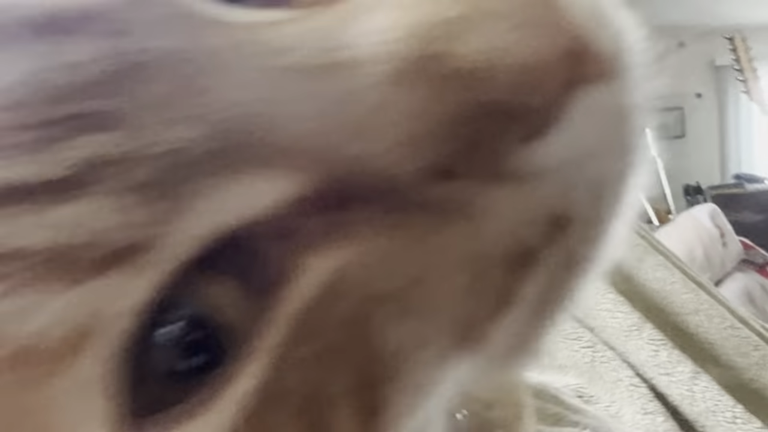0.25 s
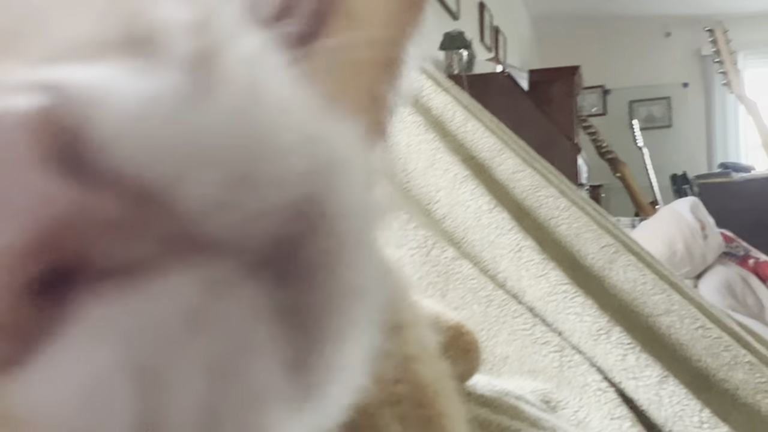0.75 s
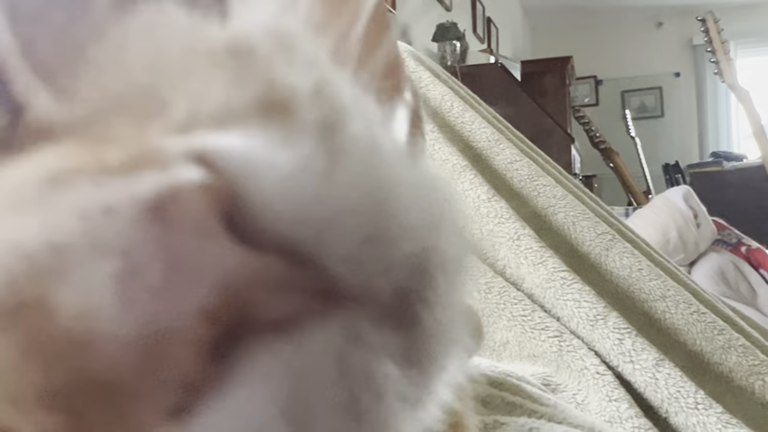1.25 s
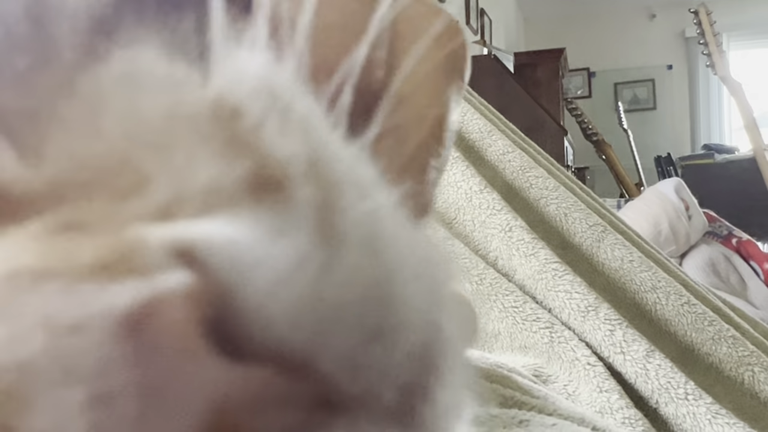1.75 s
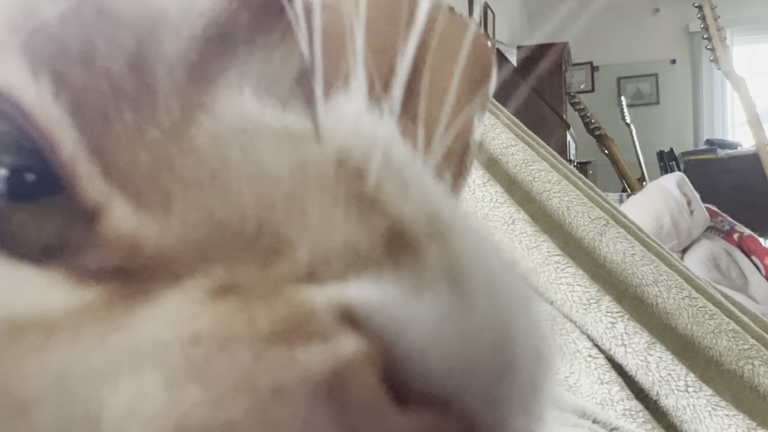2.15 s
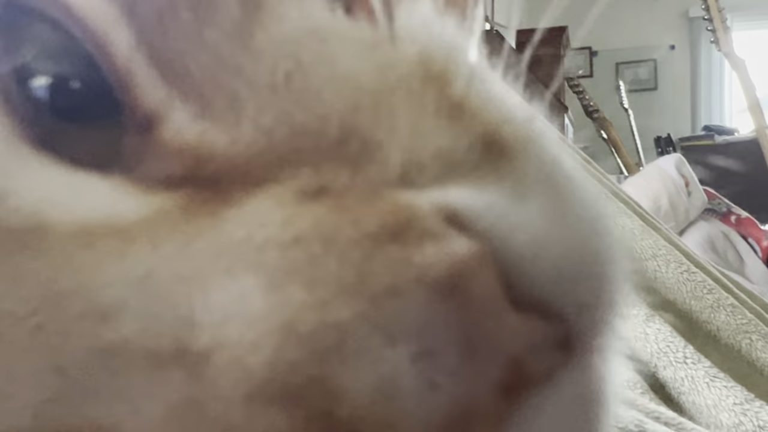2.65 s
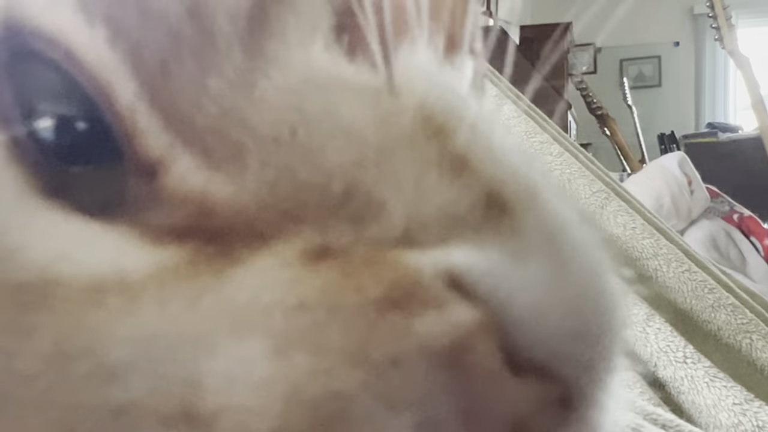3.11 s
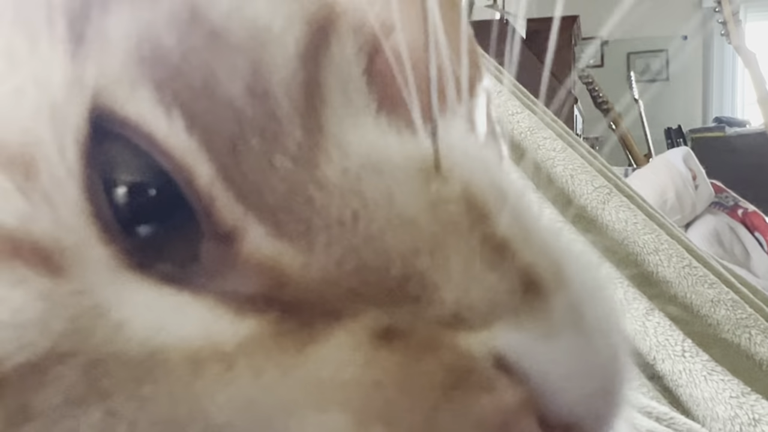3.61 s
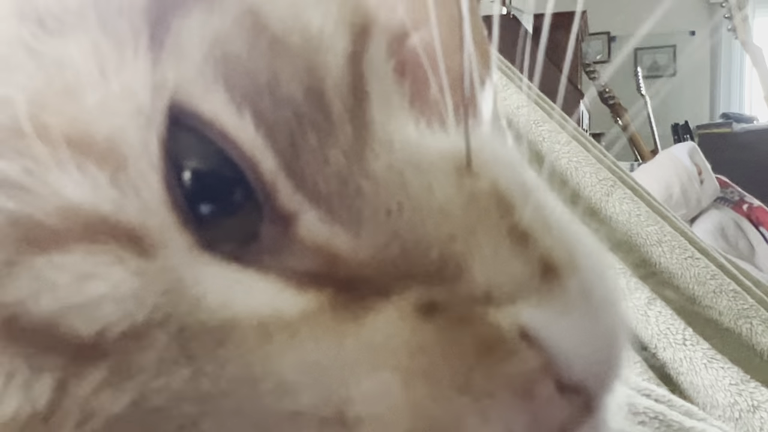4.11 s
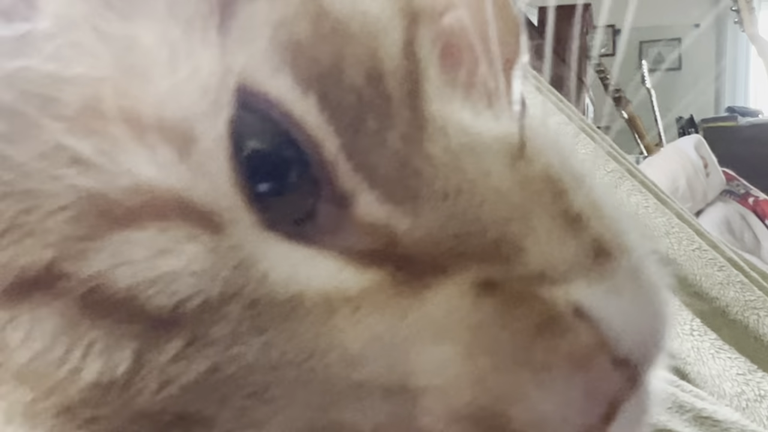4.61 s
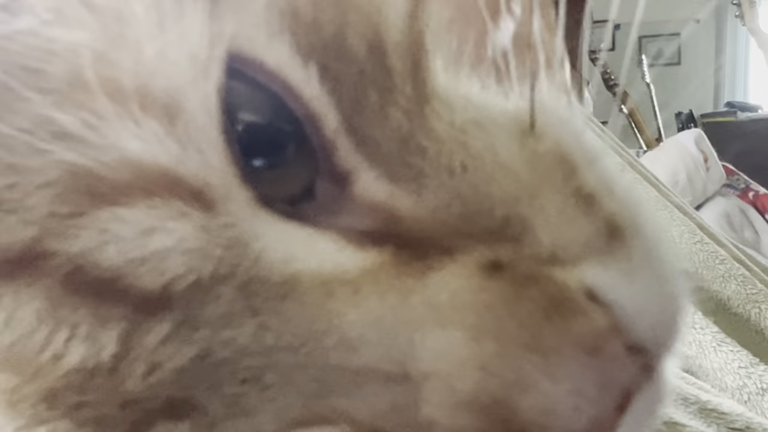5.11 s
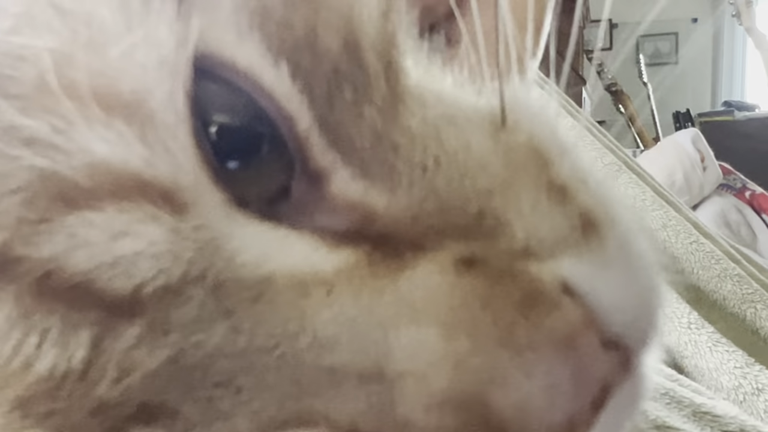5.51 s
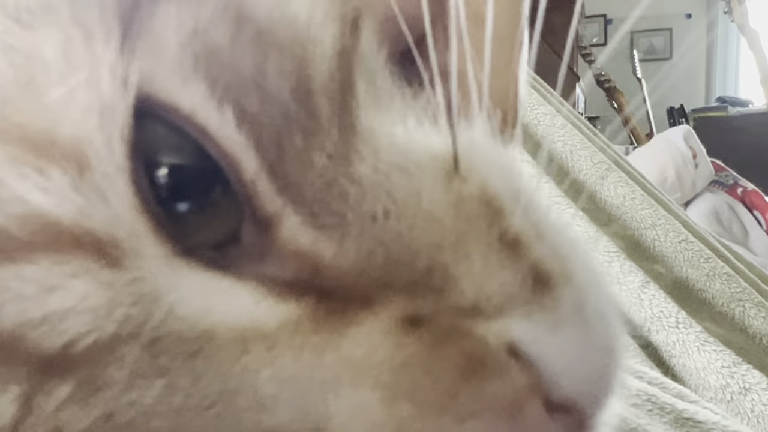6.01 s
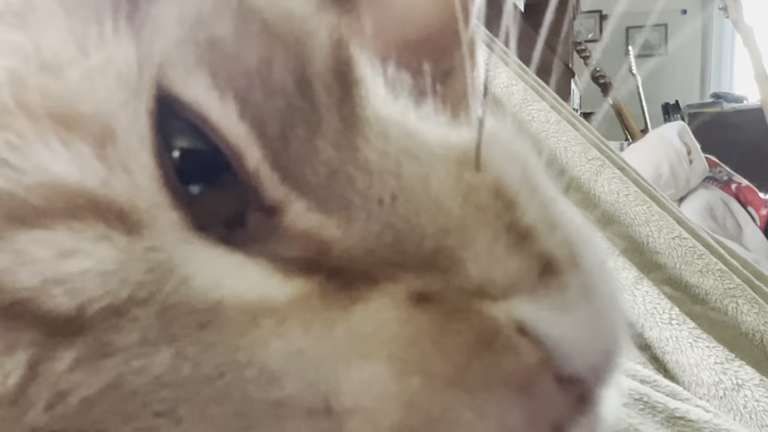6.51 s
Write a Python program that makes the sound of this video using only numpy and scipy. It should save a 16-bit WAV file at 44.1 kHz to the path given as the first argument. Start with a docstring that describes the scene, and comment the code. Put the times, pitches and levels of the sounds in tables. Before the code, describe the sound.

Very close cat purring: deep fluttering chest rumble, five brief rolling trills with nasal hiss, soft throat catches and faint puffs of hiss.

```python
"""A quiet room: a cat purrs with its nose almost on the microphone.
The larynx throbs about thirty times a second: a low chest rumble that five times swells into a trill,
where every throb is a short burst of vocal-fold slaps ringing in throat and mouth, with hiss and a faint
falling whistle in the nose. Small throat catches and mouth ticks are pulses of tone and noise.
Shaped noise makes the puffs of hiss, about four a second, and the still air of the room."""
import sys
import numpy as np
from scipy import signal
from scipy.fft import rfft, irfft
from scipy.io import wavfile
from scipy.ndimage import uniform_filter1d

SR = 44100
rng = np.random.default_rng(int(sys.argv[2]) if len(sys.argv) > 2 else 0)


def output_pcm(signal):
    """Save a mono or channel-first signal as 16-bit PCM at the path in sys.argv[1].

    Samples are clipped to [-1, 1] before scaling.
    """
    pcm = np.clip(np.atleast_2d(signal).T, -1, 1) * 32767
    wavfile.write(sys.argv[1], SR, np.round(pcm).astype(np.int16))


N = 297675
TIME = np.arange(N) / SR
BINS = np.maximum(np.arange(N // 2 + 1) * SR / N, 1)   # Hz
THROB_S = 0.032   # nominal length of one throb

# trills, levels ahead of the output gains: (first throb [s], last throb [s], throb rate [1/s], rise [s],
# hold [s], flutter peak [dB], fade by the end [dB], overtone peak [dB], chest rumble [dB],
# fold pressure at the peak [0-1], fold pressure at the end [0-1])
TRILLS = [(0.361, .523, 31, 0.0043, 0.084, -44.5, 4, -53.5, -53, 0.13, .12),
          (1.59, 1.88, 31, 0.069, 0.11, -36, 12.5, -48.3, -54.5, 0.8, 0.05),
          (2.845, 3.28, 32.4, 0.041, .13, -32, 10, -47, -48.5, 1, 1),
          (4.432, 4.758, 30.7, 0.11, .02, -40.5, 9.5, -53, -56, .75, 0.07),
          (5.932, 6.363, 32.5, 0.033, 0.015, -37, 7.5, -51, -56.5, 0.97, .94)]


def from_db(db):
    """Decibels to gain."""
    return 10 ** (np.asarray(db) / 20)


def rms_one(x):
    """Scale to unit rms."""
    return x / np.sqrt(np.mean(x ** 2) + 1e-20)


def at_bins(points):
    """Interpolate a spectrum along log frequency."""
    hz, value = np.transpose(points)
    return np.interp(np.log(BINS), np.log(hz), value)


def noise(spectrum, channels=1):
    """Gaussian noise of a given spectrum, at unit rms."""
    white = rng.standard_normal((channels, N))
    return rms_one(irfft(rfft(white) * from_db(at_bins(spectrum)), N))


def cut(x, hz, kind, order=2):
    """Butterworth low- or high-pass."""
    return signal.sosfilt(signal.butter(order, hz, kind, fs=SR, output="sos"), x + 1e-18)


def resonate(x, modes):
    """Parallel two-pole resonances: (frequency [Hz], width [Hz], gain [dB])."""
    out = 0
    for hz, width_hz, db in modes:
        r = np.exp(-np.pi * width_hz / SR)
        poles = [1, -2 * r * np.cos(2 * np.pi * hz / SR), r * r]
        ringing = signal.lfilter([1, 0, -1], poles, x + 1e-18)
        out = out + from_db(db) * ringing * (1 - r * r) / 2
    return out


def progress(when, start, end):
    """0 before start, 1 after end, a straight line between."""
    return np.clip((when - start) / max(end - start, 1 / SR), 0, 1)


def held(start, end, attack_s, release_s):
    """Envelope that is 1 from start to end, with Gaussian flanks."""
    before = np.maximum(start - TIME, 0) / attack_s
    after = np.maximum(TIME - end, 0) / release_s
    return np.exp(-before ** 2 - after ** 2)


def throb_times(quiet_throb_hz=28.18, jitter_s=0.0011):
    """The larynx closes regularly in each trill, a little more slowly and less evenly in between."""
    trills = [np.linspace(a, b, round((b - a) * rate) + 1) for a, b, rate, *_ in TRILLS]
    rests = zip([0] + [t[-1] for t in trills], [t[0] for t in trills] + [N / SR])
    quiet = [np.linspace(a, b, round((b - a) * quiet_throb_hz) + 1)[1:-1] for a, b in rests]
    quiet = np.concatenate(quiet)
    quiet = quiet + rng.normal(0, jitter_s, len(quiet))
    loud = [(s, *effort(row, s)) for row, times in zip(TRILLS, trills) for s in times]
    return loud, np.sort(np.concatenate([[0, N / SR], quiet, *trills]))


def effort(row, when, rise_db_per_s=134.5, overtones_follow=0.5, onset_pressure=0.25, relax_curve=1.2):
    """A trill rises quickly, holds and fades: flutter dB, overtone dB and fold pressure at a given time."""
    first, last, _, rise_s, hold_s, peak_db, fade_db, overtone_db, _, peak_pressure, end_pressure = row
    to_rise = 1 - progress(when, first, first + rise_s)
    drop_db = rise_db_per_s * rise_s * to_rise + fade_db * progress(when, first + rise_s + hold_s, last)
    # pressure moves to its peak during the rise, then to its end value
    relaxed = progress(when, first + rise_s, last) ** relax_curve
    pressure = peak_pressure + (onset_pressure - peak_pressure) * to_rise
    pressure = pressure + (end_pressure - peak_pressure) * relaxed
    return peak_db - drop_db, overtone_db - overtones_follow * drop_db, np.clip(pressure, 0, 1)


def folds(pressure):
    """Harder pressed, folds flutter lower, for a larger share of the throb, and more roughly."""
    light_hz, pressed_hz = 487, 280.3
    light_open, pressed_open = 0.38, 0.6   # share of the throb
    light_rough, pressed_rough = 0.18, 0.7
    hz = light_hz * (pressed_hz / light_hz) ** pressure
    share = light_open + (pressed_open - light_open) * pressure ** 4
    rough = light_rough + (pressed_rough - light_rough) * pressure ** 2
    return hz, share, rough


def fold_slaps(hz, share, rough, size, jitter=0.2, glide=0.5):
    """One throb: a handful of fold slaps that quicken as it goes; pressed hard, they come unevenly."""
    slaps, length_s, t = np.zeros(size), min(share, 1) * THROB_S, 0
    for late, strong in rng.standard_normal((16, 2)):
        if t >= length_s:
            break
        phase = (t + 0.001) / (length_s + 0.002)
        slaps[int(t * SR)] = np.sqrt(np.sin(np.pi * phase)) * np.exp(0.2 * rough * strong)
        t += np.exp(jitter * rough * late - glide * share * (phase - 0.5)) / hz
    return slaps


def trill(throbs, rasp_db=-28, follow=0.16, soften=0.53, vary_db=0.87, crisp_db=-6, size=2800):
    """Fold slaps ring in throat and mouth; returns that sound, the puffs of air let through, their crackle."""
    # resonances: (frequency [Hz], width [Hz], gain [dB])
    throat_modes = [(269, 170, -7.5), (386.4, 65, -7.5)]
    windpipe_modes = [(191, 54, -0.81)]
    mouth_modes = [(738, 510, 10), (1160, 95, -14)]
    flutter_spread = 0.04   # relative, from throb to throb at full pressure
    out, flow, crackle = np.zeros((3, N))
    age = np.arange(size) / SR
    for start, low_db, high_db, pressure in throbs:
        hz, share, rough = folds(pressure)
        hz = hz * np.exp(flutter_spread * pressure * rng.standard_normal())
        low_db, high_db = np.array([low_db, high_db]) + vary_db * rng.standard_normal(2)
        slaps = fold_slaps(hz, share, rough, size)
        opening = np.sin(np.pi * np.minimum(age / (share * THROB_S + 0.014), 1))
        # the throat sinks with the flutter; rough throbs shake the windpipe too
        sink = (hz / 420) ** follow
        throat = resonate(slaps, [(f * sink, width_hz, db) for f, width_hz, db in throat_modes])
        throat = throat + rough ** 2 * resonate(slaps, windpipe_modes)
        # soft tissue limits the swing
        throat = np.tanh(rms_one(throat) / 2.5)
        throat = cut(cut(throat, 475 * sink, "low", order=8), 120, "high")
        # the first slaps of a throb are the sharpest
        rasp = from_db(rasp_db) * opening * rng.standard_normal(size)
        sharp = (slaps + rasp) * np.exp(-soften * age / (share * THROB_S))
        mouth = cut(cut(resonate(sharp, mouth_modes), 1108, "low", order=8), 456, "high", order=3)
        # a throb rings on over two cycles
        at = slice(int(start * SR), int(start * SR) + size)
        out[at] += (from_db(low_db) * rms_one(throat) + from_db(high_db) * rms_one(mouth)) / np.sqrt(2)
        flow[at] += from_db(high_db) * opening
        crackle[at] += from_db(high_db + crisp_db) * rough * rms_one(slaps)
    return out, flow, crackle


def chest_levels(fade_share=0.51, rumble_late_s=0.071, rumble_attack_s=0.11):
    """Gains of the chest's tone and rumble: a resting purr, soft strokes, and a swell under each trill."""
    # soft strokes between the trills: (start [s], end [s], tone level ahead of the output gain [dB])
    soft_purrs = [(0.142, .2, -65), (0.98, 1.183, -50.5), (2.22, 2.57, -53.5), (3.634, 3.937, -54.5),
                  (5.1, 5.55, -59.5), (6.56, 6.66, -60.5)]
    soft_rumble_db = -9.5   # relative to the stroke's tone
    trill_tone_db = -11.5   # relative to the trill's flutter peak
    rest_tone_db, rest_rumble_db = -68.5, -62.5
    lead_s, lag_s, attack_s, release_s = 0.019, 0.027, 0.058, 0.062
    # powers add up
    tone, rumble = from_db(rest_tone_db) ** 2, from_db(rest_rumble_db) ** 2
    for start, end, db in soft_purrs:
        stroke = from_db(db) * held(start, end, attack_s, release_s)
        tone = tone + stroke ** 2
        rumble = rumble + (from_db(soft_rumble_db) * stroke) ** 2
    for first, last, _, rise_s, hold_s, peak_db, fade_db, _, rumble_db, *_ in TRILLS:
        fade = from_db(-fade_share * fade_db * progress(TIME, first + rise_s + hold_s, last))
        tone_swell = fade * held(first - lead_s, last + lag_s, attack_s, release_s)
        rumble_swell = fade * held(first + rumble_late_s, last + lag_s, rumble_attack_s, release_s)
        tone = tone + (from_db(peak_db + trill_tone_db) * tone_swell) ** 2
        rumble = rumble + (from_db(rumble_db) * rumble_swell) ** 2
    return np.sqrt(tone), np.sqrt(rumble)


def chest(throbs, tone_db=-1.0, rumble_db=3.0, deep_db=-60, throb_depth=0.16, delay_s=0.011):
    """The chest swings with every throb, mostly at twice its rate, over a rumble that pulses with it."""
    # chest vibration: (multiple of the throb rate, relative level [dB])
    orders = [(1, -10.5), (2, 0), (3, -14.5)]
    # rumble spectrum: (frequency [Hz], relative density [dB])
    rumble_spectrum = [(18, -14.5), (28, -8), (40, -12), (64, -0.5), (110, -5.5), (165, -12), (205, -11.5),
                       (250, -17.5), (350, -22), (450, -36.5), (700, -38), (1500, -95)]
    tone_gain, rumble_gain = chest_levels()
    turn = 2 * np.pi * np.interp(TIME - delay_s, throbs, np.arange(len(throbs)))
    tone = sum(from_db(db) * np.cos(round(multiple) * turn) for multiple, db in orders)
    rumble = noise(rumble_spectrum)[0] * (1 + throb_depth * np.cos(turn))
    # the deepest part keeps one level; effort drives the rest
    deep = from_db(deep_db) * rms_one(cut(rumble, 48, "low", order=4))
    upper = from_db(rumble_db) * rumble_gain * rms_one(cut(rumble, 87.5, "high", order=3))
    return np.sqrt(2) * from_db(tone_db) * tone_gain * tone + upper + deep


def nose(flow, crackle, air_db=-14, stream_share=1.0, wander_hz=150):
    """Puffs and slaps hiss in the nose; the narrow nostrils add a thin, falling whistle that flutters."""
    # resonances: (frequency [Hz], width [Hz], gain [dB])
    nose_modes = [(2064, 440, 2), (2930, 450, -11), (3990, 300, -1.5), (5200, 1400, -9.5),
                  (7400, 880, -8.5)]
    end_hz, fall_hz = 2994, 380   # the fall scales with the peak fold pressure
    whistle_db, lead_s, lag_s, fade_s = -80.5, 0.03, 0.027, 0.073
    stream = np.maximum(uniform_filter1d(flow, size=4000), 0)
    turbulence = rng.standard_normal(N) * (flow + stream_share * stream)
    air = from_db(air_db) * resonate(turbulence + crackle, nose_modes)
    wander = cut(rng.standard_normal(N) + 1j * rng.standard_normal(N), wander_hz, "low")
    whistle = 0
    for first, last, *_, pressure, _ in TRILLS:
        hz = end_hz + fall_hz * pressure * np.interp(TIME, [first, last], [1, 0])
        tone = rms_one((wander * np.exp(2j * np.pi * np.cumsum(hz) / SR)).real)
        whistle = whistle + tone * held(first - lead_s, last + lag_s, fade_s, fade_s)
    puffs = flow / (stream + 0.05 * stream.max())
    return air + from_db(whistle_db) * whistle * (1 + puffs) / 2


def small_sounds(catch_s=0.0029, tick_s=0.0015, grit_db=-12, tick_hz=1900, tick_width_hz=1600):
    """Catches are a few cycles of fold flutter, the higher ones gritty; ticks are short snaps in the mouth."""
    # soft catches of the throat: (time [s], envelope peak [dB], frequency [Hz])
    catches = [(0.31, -37.5, 256), (2.757, -47, 670), (2.785, -48, 760), (2.817, -43.5, 667),
               (2.832, -29, 250), (5.872, -55, 760), (5.907, -48.5, 667), (5.919, -37, 290)]
    # tiny wet ticks of the mouth: (time [s], peak [dB])
    ticks = [(2.353, -52.5), (2.766, -62), (3.267, -56)]
    out = np.zeros(N)
    grit = rms_one(cut(cut(rng.standard_normal(N), 1330, "low", order=5), 360, "high"))
    for s, db, hz in catches:
        age = np.clip(TIME - s, 0, 20 * catch_s)
        envelope = (age / catch_s * np.exp(1 - age / catch_s)) ** 2
        gritty = from_db(grit_db) * grit * (hz / 700) ** 2
        out += from_db(db) * envelope * (np.sin(2 * np.pi * hz * age) + gritty)
    for s, db in ticks:
        snap = rng.standard_normal(N) * (TIME >= s) * np.exp(-np.abs(TIME - s) / tick_s)
        snap = resonate(snap, [(tick_hz, tick_width_hz, 0)])
        out += from_db(db) * snap / np.abs(snap).max()
    return out


def hiss(hiss_db=5, apart_db=-8, edge=2.75, rest_db=-95, crest=0.45, longest_rise_s=0.1, rise=0.73, fall=0.74):
    """Each puff of faint bright hiss swells to a crest and fades, nearly alike at both ports."""
    # puffs: (start [s], length [s], level ahead of hiss_db [dB])
    puffs = [(0.193, 0.07, -78.5), (0.316, 0.16, -78.5), (0.474, 0.21, -68.5), (0.747, 0.128, -73.5),
             (0.938, 0.1, -71), (1.163, 0.128, -73), (1.327, 0.29, -72.5), (1.597, 0.034, -79),
             (1.703, 0.19, -73.5), (1.968, 0.12, -70.5), (2.182, 0.118, -74), (2.341, 0.12, -70.5),
             (2.563, 0.1, -76.5), (2.765, 0.19, -72), (3.008, 0.19, -74), (3.244, 0.15, -70.5),
             (3.495, 0.11, -72), (3.693, 0.16, -73.5), (3.97, 0.13, -76), (4.237, 0.13, -77),
             (4.513, 0.11, -75.5), (4.722, 0.18, -76), (5.048, 0.17, -76.5), (5.293, 0.15, -75),
             (5.588, 0.11, -80), (5.792, 0.13, -76.5), (6.012, 0.144, -73.5), (6.258, 0.21, -69.5),
             (6.556, 0.18, -73)]
    # hiss spectrum: (frequency [Hz], relative density [dB])
    hiss_spectrum = [(1200, 0.5), (2200, -3.5), (4300, -2.5), (5800, -4.5), (8300, 2), (9800, -8),
                     (11200, 3.5), (13000, 3.5), (15500, 1.5)]
    coarse_s = TIME[::50]
    power = from_db(rest_db) ** 2
    for start, length_s, db in puffs:
        rise_s = min(crest * length_s, longest_rise_s)
        past = coarse_s - start - rise_s
        width_s = np.where(past < 0, rise * rise_s, fall * (length_s - rise_s))
        power = power + from_db(db) ** 2 * np.exp(-np.abs(past / width_s) ** edge)
    level = np.interp(TIME, coarse_s, np.sqrt(power))
    both = noise(hiss_spectrum) + from_db(apart_db) * noise(hiss_spectrum, channels=2)
    return from_db(hiss_db) * level * both


def room_air(level_db=-65):
    """Still air as steady noise, alike at both ports in the bass only."""
    # room spectrum: (frequency [Hz], relative density [dB])
    room_spectrum = [(20, -7), (100, 6.5), (300, 0), (550, -8), (800, -18), (1200, -14), (1700, -23.5),
                     (2600, -30.5), (5000, -36.5), (15000, -46.5)]
    apart = cut(noise(room_spectrum, channels=2), 250, "high", order=1)
    return from_db(level_db) * (noise(room_spectrum) + apart)


def scene():
    """The cat at the microphone, nearer the left port, over the still air of the room."""
    # port balance: (frequency [Hz], left over right [dB])
    balance = [(60, 1.1), (150, 2.5), (460, 2.5), (620, 13.5), (1000, 3), (1300, 12.5), (1800, 7),
               (3000, 8.5), (6000, 3.5), (9000, -2)]
    loud_throbs, all_throbs = throb_times()
    voice, flow, crackle = trill(loud_throbs)
    cat = voice + nose(flow, crackle) + chest(all_throbs) + small_sounds()
    sides = from_db(np.array([[1], [-1]]) * at_bins(balance) / 2)
    cat = irfft(rfft(cat) * sides / sides.mean(axis=0), N)
    return cat + hiss() + room_air()


def record(dry, cutoff_hz=15700):
    """Each port shifts the phase in its own way; the treble ends steeply."""
    # port phase: (frequency [Hz], lead of left over right [rad])
    lead = [(40, .2), (420, .42), (550, .8), (780, .28), (1350, .85), (1800, -.4), (3000, .75), (5500, .05),
            (7200, -.15), (8500, -1.3), (9900, -3.14), (12900, -6.2), (13900, -6.4), (15700, -8.6)]
    shift = np.exp(1j * np.array([[1], [-1]]) * at_bins(lead) / 2)
    heard = irfft(rfft(dry) * shift, N)
    return signal.sosfilt(signal.ellip(12, 0.1, 80, cutoff_hz, fs=SR, output="sos"), heard)


dry = scene()
out = record(dry)
output_pcm(out)
```